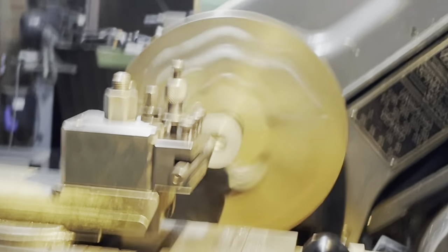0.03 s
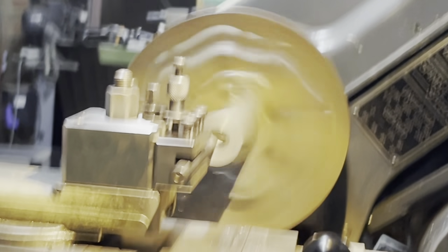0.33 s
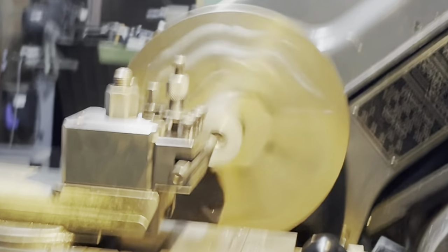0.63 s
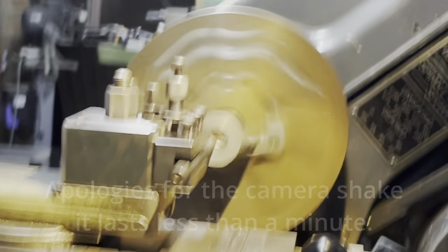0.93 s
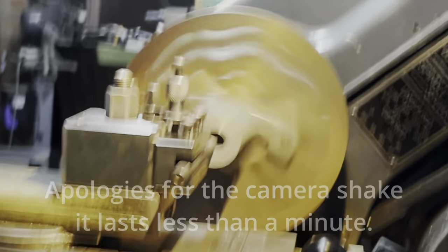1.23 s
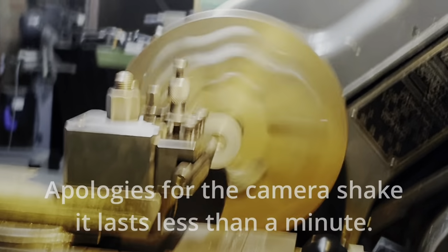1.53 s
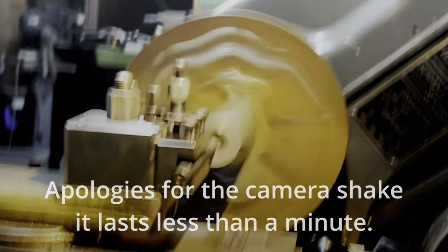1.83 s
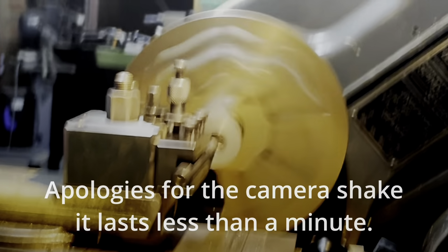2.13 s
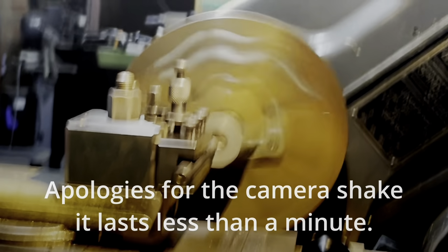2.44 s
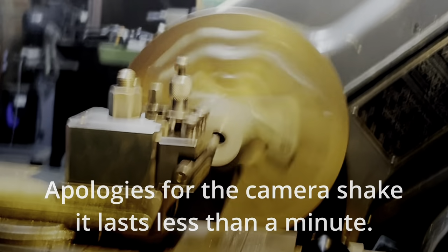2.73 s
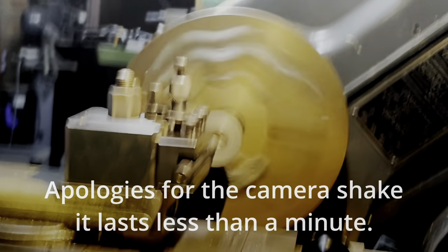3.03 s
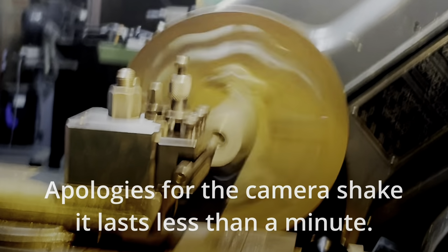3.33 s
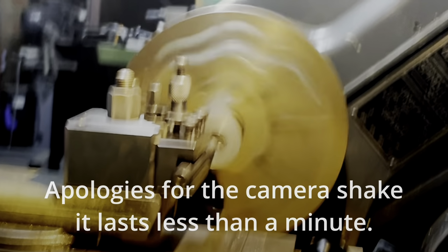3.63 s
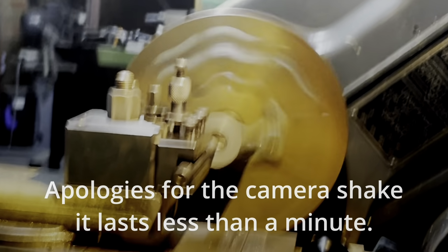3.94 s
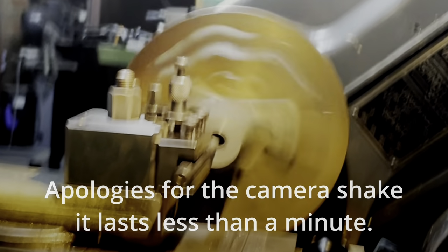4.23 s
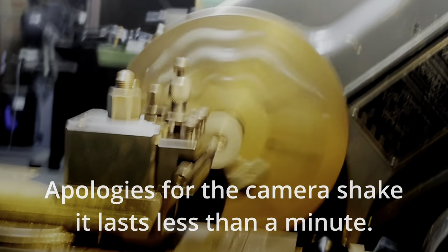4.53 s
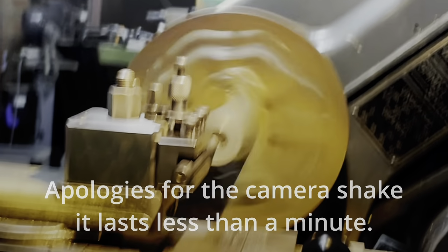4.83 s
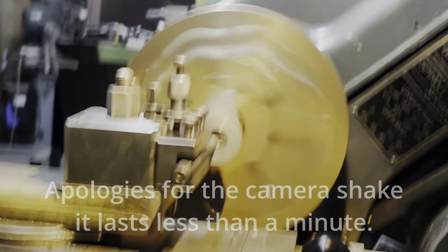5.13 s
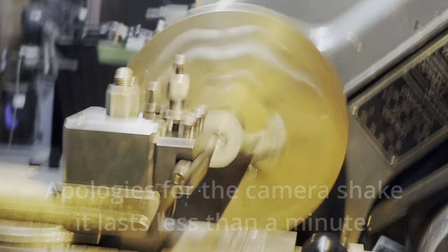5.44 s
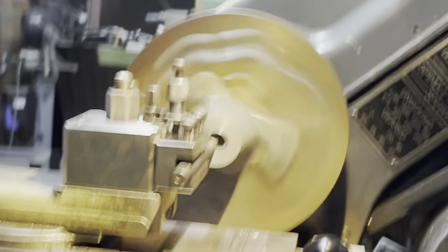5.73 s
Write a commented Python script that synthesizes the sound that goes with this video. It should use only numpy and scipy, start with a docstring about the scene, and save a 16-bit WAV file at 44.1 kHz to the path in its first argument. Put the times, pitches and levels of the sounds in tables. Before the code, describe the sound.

A metal lathe runs close by in a workshop for about six seconds, with very little echo. The loudest sound throughout is the motor's even, low hum, with a soft, throbbing rumble from the shafts and belt. Above it, the gears make a fainter whir and a wavering, slightly rattling whine that grows a little louder. The tool grazes the spinning brass in tiny, bright scrapes: three in the first 0.3 seconds, two around 1.5, a cluster near 1.9, and single ones at about 2.4 and 2.7. From about 4.3 seconds a light, high cutting hiss fades in, reaching its full level by 5 seconds. It pulses with a metallic ring about eleven times a second. Another small scrape comes at 4.7, and several more between 5.3 and 5.6. The cut and the hum continue to the end.

```python
"""A metal lathe runs close by in a workshop, cutting spinning brass.
Its motor hums at twice the mains frequency, its shafts and belt rumble, and its gears
whir and whine through the headstock, the housing that holds them. The tool grazes the
brass a few times, then settles into a light, hissing cut that rings once a turn."""
import sys
import numpy as np
from scipy import signal
from scipy.fft import rfft, irfft
from scipy.io import wavfile

SR = 44100
rng = np.random.default_rng(int(sys.argv[2]) if len(sys.argv) > 2 else 0)


def wrap_up_sound(samples):
    """Save the sound to the file named by the first command line argument, as 16-bit audio."""
    columns = np.atleast_2d(samples).T
    # keep every value between -1 and 1, then stretch to whole-number steps
    tamed = np.clip(columns, -1, 1)
    steps = np.round(tamed * 32767).astype(np.int16)
    wavfile.write(sys.argv[1], SR, steps)


N = 264628
TIME = np.arange(N) / SR
FREQUENCIES = np.fft.rfftfreq(N, 1 / SR)


def gain_of(db):
    """Turns decibels into a number to multiply a sound by."""
    return 10 ** (np.asarray(db) / 20)


def drift(rate_hz):
    """A smooth random wobble, about 1 in size, moving up to roughly the given rate."""
    keep_slow = np.exp(-(FREQUENCIES / rate_hz) ** 2) * (FREQUENCIES > 0)
    wobble = irfft(rfft(rng.standard_normal(N)) * keep_slow, N)
    return wobble / wobble.std()


def broad_shape(points):
    """A gain for each frequency: a line through the points, silent beyond both ends."""
    hz, db = np.transpose(points)
    return gain_of(np.interp(np.log(FREQUENCIES + 1), np.log(hz + 1), db, left=-140, right=-140))


def ringing_shape(rings):
    """A gain for each frequency, with a steep peak at each pitch where a part rings."""
    powers = (gain_of(db) ** 2 / (1 + ((FREQUENCIES - hz) / (0.73 * width)) ** 2) ** 2
              for hz, width, db in rings)
    return np.sqrt(sum(powers))


def sound_through(force, shape):
    """Passes a noisy force through a body that rings after each push, never before."""
    log_gain = np.log(shape + gain_of(-140))
    mirrored = np.r_[log_gain, log_gain[-2:0:-1]]
    phase = -signal.hilbert(mirrored).imag[:len(FREQUENCIES)]
    return irfft(rfft(force) * shape * np.exp(1j * phase), N) * np.sqrt(SR / 2)


def turning(turns_per_s, peak_s):
    """Swings between -1 and 1 once a turn, highest at the given moment."""
    return np.cos(2 * np.pi * turns_per_s * (TIME - peak_s))


def spindle(swings_per_turn=1, turns_per_s=11.35):
    """Swings as the brass spins, highest when the side that sticks out meets the tool."""
    return turning(swings_per_turn * turns_per_s, peak_s=5.32)


# The tones of the motor's hum. Each row: multiple of the magnetic pull's rate, level in dB.
HUM_TONES = [(1, -25.5), (2, -54), (3, -72.5), (5, -53)]

def motor_hum(pull_hz=100.07, waver=0.007, flutter=0.17):
    """A magnetic pull hums in step with the mains; its overtones flutter as the panels shake."""
    hum = np.zeros(N)
    for multiple, db in HUM_TONES:
        depth = waver if multiple == 1 else flutter
        cycles = multiple * pull_hz * TIME + rng.random()
        level = gain_of(db) * (1 + depth * drift(8.2))
        hum += level * np.sin(2 * np.pi * cycles + depth * drift(6))
    return np.sqrt(2) * hum


# Shafts, pulleys and belt shaking the lathe's bed. Each row: pitch in Hz, level in dB.
SHAKE_TONES = [(48, -65), (53.2, -65.5), (75.2, -55), (83, -58), (91.4, -51.5), (93, -57), (95.8, -56),
               (104.6, -64), (111.4, -58.5), (125, -61.5), (144.5, -68), (148.2, -63.5), (174, -67.5),
               (188.8, -63), (270, -66.5)]
# The drive's low noise. Each row: frequency in Hz, level in dB per Hz.
RUMBLE_NOISE = [(20, -102), (42, -87), (66, -75.5), (76, -62), (98, -70), (135, -75), (175, -82),
                (300, -82.5), (460, -81.5), (700, -100)]

def drive_rumble(wander_radians=0.43):
    """Unbalanced shafts and the belt make tones that throb against the hum, over a low rumble."""
    tones = np.zeros(N)
    for hz, db in SHAKE_TONES:
        phase = 2 * np.pi * (hz * TIME + rng.random())
        tones += gain_of(db) * np.sin(phase + wander_radians * drift(0.61))
    rumble = sound_through(rng.standard_normal(N), broad_shape(RUMBLE_NOISE))
    return np.sqrt(2) * tones + rumble


def whine_growth(db_per_s=0.25):
    """A gain that makes the whine slowly grow louder, passing 1 halfway through."""
    return gain_of(db_per_s * (TIME - TIME.mean()))


# The pitch in Hz of each pair of gears, low to high. The next two tables use the same order.
TOOTH_PITCHES = [1018, 1423, 1876]
# Each pair's tone. Each row: base level in dB, largest random swell in dB, swells per second,
# largest rattle in dB, pitch smear in radians.
TOOTH_TONES = [(-57, 3, 6.5, 2.5, 1.36), (-60.5, 4, 9, 1, .8), (-53.5, 4.5, 21, 3.5, 1.18)]
# Each pair runs tight and slack in two cycles. Each row: turns per second, a tight moment in
# seconds and swing in dB for the slow cycle, then the same three for the quick one.
TIGHT_CYCLES = [(1.52, 0.21, 4, 6.61, 0.17, 3), (1.675, .277, 2.5, 4.705, 0.17, 3.5),
                (1.96, 0.19, 1.8, 10.88, .123, 1.5)]

def gear_tones(rattle_hz=40, smear_hz=11.7):
    """Teeth sing, louder where off-centre gears run tight; slack makes each tone rattle and blur."""
    tones = np.zeros(N)
    for hz, tone, cycles in zip(TOOTH_PITCHES, TOOTH_TONES, TIGHT_CYCLES):
        base_db, swell_db, swell_hz, rattle_db, smear = tone
        slow_hz, slow_s, slow_db, quick_hz, quick_s, quick_db = cycles
        tight_db = slow_db * turning(slow_hz, slow_s) + quick_db * turning(quick_hz, quick_s)
        loose_db = swell_db * np.tanh(drift(swell_hz)) + rattle_db * np.tanh(drift(rattle_hz))
        phase = 2 * np.pi * hz * TIME + smear * drift(smear_hz)
        tones += gain_of(base_db + tight_db + loose_db) * np.sin(phase)
    return np.sqrt(2) * whine_growth() * tones


# The noise of rubbing teeth. Each row: frequency in Hz, base level in dB per Hz.
WHIR_NOISE = [(250, -100), (520, -81.5), (880, -76), (1070, -80.5), (1500, -81), (2050, -80.5),
              (2350, -81.5), (2900, -89.5), (5250, -97), (5600, -99), (7100, -102), (8400, -99),
              (11500, -109), (15700, -114)]
# The headstock and gear wheels ringing. Each row: pitch in Hz, width in Hz, base level in dB per Hz.
HEADSTOCK_RINGS = [(393, 18, -75), (543, 46, -76.5), (633, 9.5, -76), (654.5, 11, -78.5),
                   (725.4, 14.6, -75), (790, 17, -77), (875, 12, -72), (1034.4, 18, -72.5),
                   (1148, 57, -80.5), (1208, 16, -72), (1298, 59, -73), (1325, 15, -72.5), (1384, 7.1, -77),
                   (1558, 14, -76.5), (1629, 34, -73), (1708, 12, -74), (1763, 23.6, -69), (1817, 19, -75),
                   (1872, 61, -69), (2259, 38, -81), (2456, 39, -88), (3526, 145, -92.5), (4350, 110, -92),
                   (5205, 135, -95), (5860, 80, -101), (7650, 50, -104), (8130, 28, -100),
                   (13700, 300, -107)]

def gear_whir(turn_db=0.42, half_turn_db=0.31, uneven_db=0.5):
    """Teeth rub and rattle under a load that swings with each turn; the headstock rings with them."""
    load = gain_of(turn_db * spindle() + half_turn_db * spindle(2) + uneven_db * drift(27))
    whir = sound_through(load * rng.standard_normal(N), broad_shape(WHIR_NOISE))
    shaking = whine_growth() * load * rng.standard_normal(N)
    return whir + sound_through(shaking, ringing_shape(HEADSTOCK_RINGS))


# The tool's brief catches on the brass. Each row: start in seconds, length in seconds, contact in dB.
TOOL_CATCHES = [(0.099, 0.014, 0.5), (0.183, 0.023, 0), (0.265, 0.037, -0.5), (1.417, .024, -5),
                (1.505, 0.019, -5.5), (1.857, .035, -12), (1.933, 0.027, -2), (1.972, .028, -3),
                (2.448, 0.009, -10), (2.733, 0.057, -2.5), (4.738, 0.019, 0), (5.3, 0.035, -1),
                (5.385, .016, -5), (5.425, 0.013, 2.5), (5.466, .016, -3), (5.506, 0.011, -4),
                (5.606, 0.027, -2)]

def grazing_contact(rise_s=0.003, release_s=0.0053):
    """How hard the tool grazes the brass: each catch bites quickly, holds, and dies away."""
    contact = np.zeros(N)
    for start_s, length_s, db in TOOL_CATCHES:
        age = TIME - start_s
        rise = np.clip(age / rise_s, 0, 1)
        release = np.exp(-np.maximum(age - length_s, 0) / release_s)
        contact += gain_of(db) * rise * release
    return contact


def chips(clump_db=1.5):
    """The force of brass breaking off in a dense, clumpy stream of tiny cracks."""
    force = rng.standard_normal(N) * gain_of(clump_db * drift(800))
    return force / force.std()


# The tool moving into the brass. Each row: time in seconds, base contact in dB.
FEED_IN = [(0, -44), (4.2, -26), (4.45, -12), (4.68, -10), (4.78, -4), (5.1, 0.5), (6, -1)]
# Metal tearing at the tool's tip. Each row: frequency in Hz, level in dB per Hz at full contact.
HISS_NOISE = [(1500, -110), (3000, -105), (5000, -96), (6300, -102), (8500, -98.5), (10000, -99),
              (11000, -96), (12600, -103), (14300, -100), (14800, -109), (15700, -109)]
# The tool and holder ringing. Each row: pitch in Hz, width in Hz, level in dB per Hz at full contact.
TOOL_RINGS = [(2160, 210, -75), (6930, 300, -91), (7900, 99, -85), (8230, 220, -86.5), (8860, 190, -82.5),
              (9500, 200, -91), (10240, 110, -94), (10700, 170, -92.5), (11000, 140, -98),
              (12050, 150, -92), (12350, 80, -95), (13200, 200, -96), (13500, 83, -88), (14100, 90, -86),
              (14000, 120, -96)]
# The brass ringing. Each row: pitch in Hz, width in Hz, level in dB per Hz at full contact.
BRASS_RINGS = [(2200, 180, -74), (4580, 180, -87), (7000, 350, -87.5)]

def cutting(steady_db=-3.5, uneven_db=1.5, turn_db=2.0, bite_sharpness=2.1, bite_db=2.2):
    """Chips hiss and ring the tool; once a turn the tool bites deeper and rings the brass."""
    feed = gain_of(np.interp(TIME, *np.transpose(FEED_IN)))
    steady_contact = feed * gain_of(steady_db + uneven_db * drift(70) + turn_db * spindle())
    contact = np.hypot(steady_contact, grazing_contact())
    tool_shape = np.hypot(broad_shape(HISS_NOISE), ringing_shape(TOOL_RINGS))
    hiss = sound_through(contact * chips(), tool_shape)
    once_a_turn = ((1 + spindle()) / 2) ** bite_sharpness
    bite = feed * once_a_turn * gain_of(bite_db * np.tanh(drift(30)))  # no two turns cut equally deep
    return hiss + sound_through(bite * chips(), ringing_shape(BRASS_RINGS))


def with_echoes(sound, echo_db=-11.5, decay_s=0.016, count=24):
    """Adds quick echoes off the lathe's bed, its guard and the walls, which colour the sound."""
    delays_s = rng.uniform(0.002, 0.03, count)
    bounces = np.zeros(SR // 20)
    bounces[(delays_s * SR).astype(int)] = rng.choice([-1, 1], count) * np.exp(-delays_s / decay_s)
    echoes = signal.oaconvolve(sound, bounces / np.linalg.norm(bounces))[:N]
    # small surfaces throw back only the treble
    treble_filter = signal.butter(2, 1800, "high", fs=SR, output="sos")
    return sound + gain_of(echo_db) * signal.sosfilt(treble_filter, echoes)


def scene():
    """The whole lathe, heard from one spot."""
    lathe = motor_hum() + drive_rumble() + gear_tones() + with_echoes(gear_whir() + cutting())
    return lathe[None]


def record(dry):
    """Takes away the very highest treble."""
    cutoff_hz = 15760
    low_pass = signal.firwin(1023, cutoff_hz, window=("kaiser", 9), fs=SR)
    return signal.oaconvolve(dry, low_pass[None], "same")


dry = scene()
out = record(dry)
wrap_up_sound(out)
```